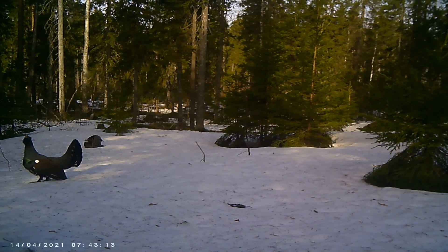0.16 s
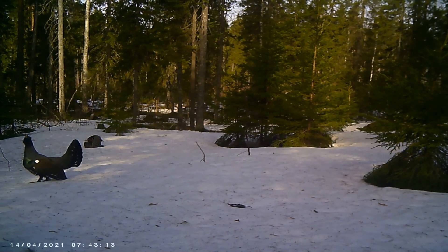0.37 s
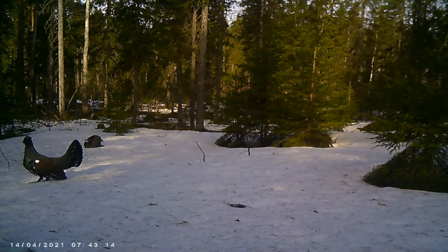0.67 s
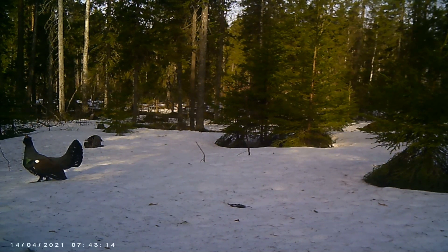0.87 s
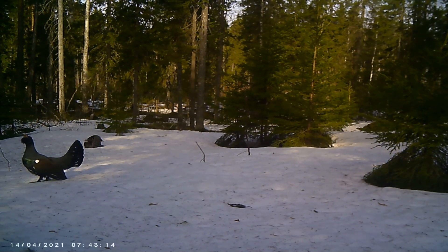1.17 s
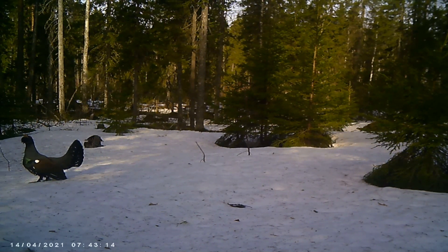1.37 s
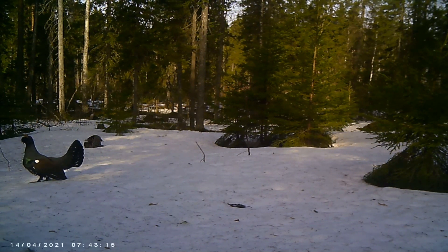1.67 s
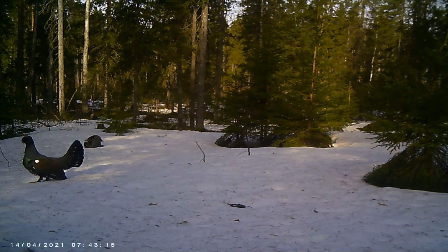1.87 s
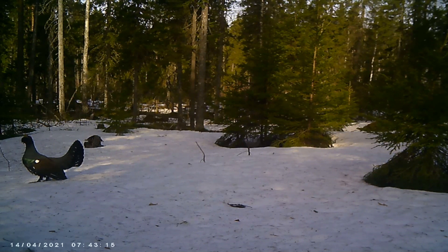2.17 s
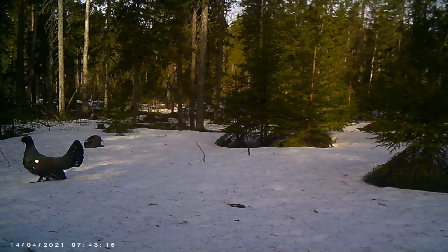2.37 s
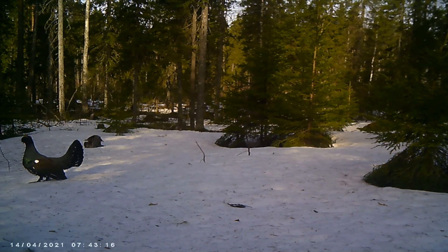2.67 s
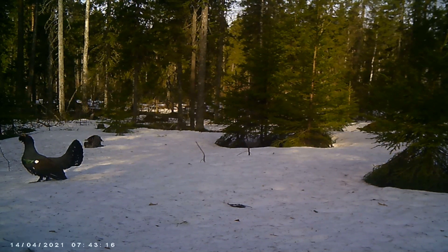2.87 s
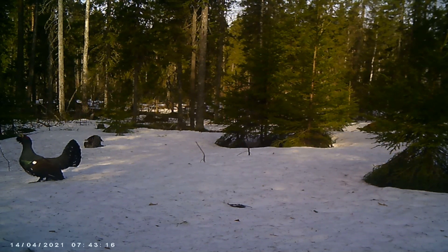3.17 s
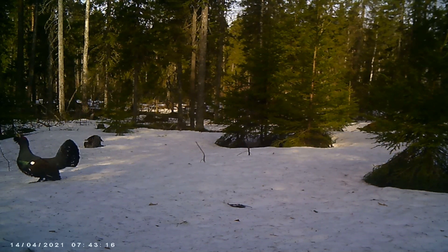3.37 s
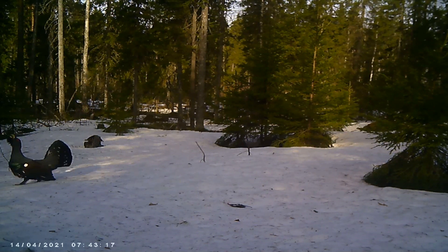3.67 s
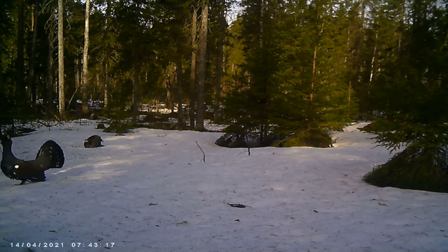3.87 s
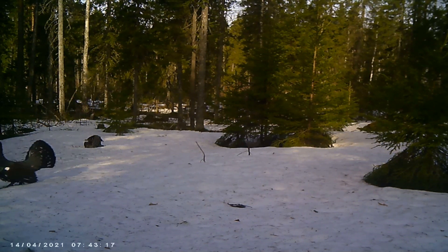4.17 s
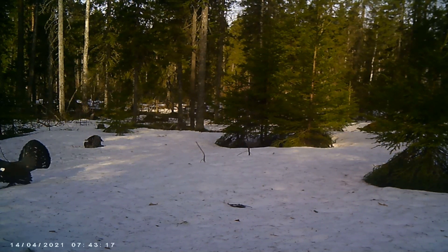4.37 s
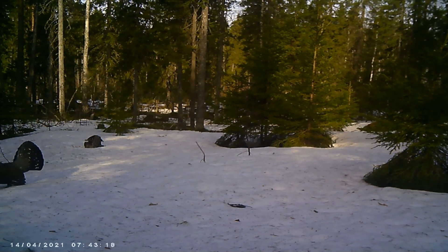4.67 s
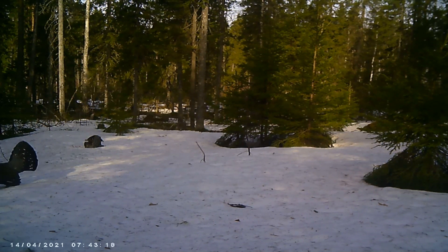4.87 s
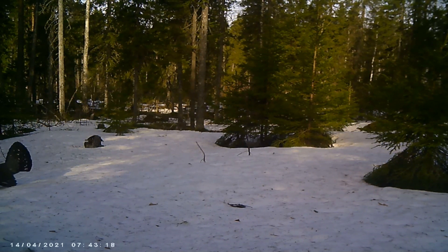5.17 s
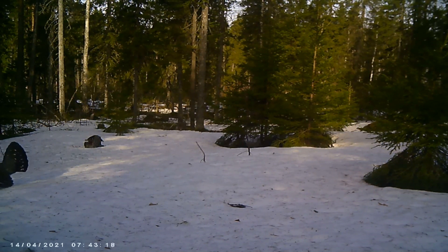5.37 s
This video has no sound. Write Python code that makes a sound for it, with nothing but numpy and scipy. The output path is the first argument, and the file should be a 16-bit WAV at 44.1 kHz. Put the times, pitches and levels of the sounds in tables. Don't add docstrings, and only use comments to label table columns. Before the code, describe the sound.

A large forest bird snaps dry double clicks that quicken into a trill, pops softly, then hisses in scraping bursts over low thumping rumble.

```python
import sys
import numpy as np
from scipy import signal
from scipy.fft import rfft, irfft, next_fast_len
from scipy.io import wavfile
from scipy.ndimage import uniform_filter1d

SR = 44100
rng = np.random.default_rng(int(sys.argv[2]) if len(sys.argv) > 2 else 0)


def generate_wav(signal):
    frames = np.transpose(np.atleast_2d(signal))
    scaled = np.clip(frames, -1, 1) * 32767
    pcm = np.round(scaled).astype(np.int16)
    wavfile.write(sys.argv[1], SR, pcm)


def nominal_scale(level):
    x = np.asarray(level, float) / 20
    return 10 ** x


N = 243873

# ([t/s, peak level/dB, air-
# sac pop level/dB], windpipe modes [f/Hz, level/dB, t60/s])
CLICKS = [
    ([(1.1578, -22, -55)], [(1540, -3, 0.049), (2080, 4, 0.018), (2690, -3.5, 0.029), (2920, -3, 0.026), (3383, 0, 0.031), (3630, -9, 0.027), (4200, -20, .025), (4620, -15, 0.039), (5320, -19, 0.045), (5800, -18, 0.045), (6200, -12, 0.044), (7420, -11, 0.029), (8330, -9.5, 0.017), (10700, -19, 0.031)]),
    ([(1.3109, -30.5, -53)], [(1384, -7, 0.04), (1590, 3.5, 0.02), (2090, -5.5, 0.033), (2670, -11.5, 0.066), (3256, -19, .03), (3490, -12, 0.066), (4100, -12, 0.027), (4920, -18, 0.087), (7620, -14, 0.023), (8370, -11, 0.026), (8800, -16, 0.041)]),
          ([(2.1555, -26, -56.5)], [(1440, -7.5, 0.035), (1956, -3, 0.025), (2140, -4.5, 0.028), (2625, -1.5, 0.036), (3233, -3.5, 0.03), (3470, -5, 0.027), (4400, -17, 0.044), (5103, -19, 0.046), (5850, -17.5, 0.059), (7500, -14, 0.023), (9000, -24, 0.01)]),
    ([(2.3002, -28.5, -49)], [(810, -21, 0.4), (1403, -8.5, 0.084), (2073, -17, 0.08), (1690, -19, 0.043), (3180, -12, 0.044), (3380, -6.5, 0.027), (4050, -13.5, 0.046), (4810, -18.5, 0.084), (6060, -21, 0.029), (6700, -24, 0.036), (7660, -6, 0.0083), (8900, -25, 0.024)]),
          ([(2.8215, -26.5, -52)], [(1305, -9.5, 0.024), (2020, -6.5, 0.041), (2635, -0.5, 0.04), (3190, 2.5, 0.034), (3410, 0, 0.035), (3960, -9.5, 0.037), (4700, -13, 0.02), (5670, -22, 0.034), (6000, -10, 0.024), (7400, -10, 0.016), (8403, -17, 0.022), (9860, -24, 0.058)]),
    ([(2.9352, -35, -48.5)], [(1375, -4, 0.029), (1959, -10, .05), (3120, -2.5, 0.059), (3320, -2, 0.054), (3850, -12, 0.061), (4680, -9, 0.079), (5290, -8.5, 0.076), (6400, 0, 0.015), (7430, -6, 0.014), (8650, -12, 0.027), (9878, -14, 0.032)]),
          ([(3.2166, -27.5, -49.5)], [(1200, -14.5, 0.09), (1950, -4.5, 0.047), (2567, 0, 0.069), (3160, 4.5, .03), (3380, 4.5, 0.039), (3590, 0, 0.037), (4554, -6.5, 0.087), (5400, -15, 0.045), (5980, -17, 0.045), (6750, -22, 0.033), (8403, -24, 0.057)]),
    ([(3.4795, -29, -50.5)], [(1168, -15.5, 0.074), (1910, -6.5, 0.046), (2540, 0, 0.057), (3100, 2, 0.04), (3225, 3.5, 0.042), (3510, 4, 0.062), (3730, -5, .02), (4530, -10, 0.045), (5370, -4, 0.035), (6300, -10.5, 0.04), (8403, -16, 0.057)]),
    ([(3.3019, -37.5, -53.5)], [(1248, -10.5, .08), (1940, -6.5, 0.046), (2574, -4, 0.08), (3150, -3, 0.043), (3350, -2.5, 0.06), (4530, -15, 0.064), (5310, -7, 0.057), (5970, -14, 0.07), (7950, -4.5, 0.017), (8630, -10, 0.039)]),
    ([(3.5359, -36.5, -47.5)], [(1300, -12, .05), (1940, -10, 0.055), (2510, 1.5, 0.094), (3100, -5, 0.043), (3250, -5, 0.05), (4532, -13, 0.064), (5071, -15, .04), (5300, -7, 0.072), (7840, -6, 0.018), (8600, -15, 0.039)]),
          ([(3.6526, -28, -50)], [(1900, -8.5, 0.045), (2527, 0, 0.086), (3130, 2, 0.043), (3360, 4, 0.048), (3530, 3, 0.033), (4478, -8, 0.045), (5200, -11, 0.055), (5630, -4.5, 0.031), (5787, -11, .034), (6298, -6, 0.025), (8000, -5.5, 0.022), (9600, -28, 0.014)]),
    ([(3.7544, -29, -53.5)], [(1890, -6.5, 0.038), (2470, -4, 0.02), (3034, 5, 0.048), (3270, 6.5, 0.047), (3540, -7, .025), (4310, -3, 0.04), (4510, -8, .04), (5474, -7, 0.04), (5850, -10, 0.03), (6174, -3, 0.038), (7860, -5, 0.022), (8500, -14, 0.02)]),
    ([(3.8038, -30, -51)], [(1770, -13, 0.03), (2440, -3.5, 0.088), (3030, 4, 0.076), (3260, -4, .03), (4400, -10, 0.03), (5370, -7, 0.034), (6080, -6, 0.028), (8140, -10, 0.023), (9249, -24, 0.034)]),
    ([(3.8487, -31.5, -53.5)], [(1766, -13, 0.023), (2524, 0, 0.08), (2950, -2, 0.045), (3125, 2.5, 0.055), (4360, -8, 0.07), (5200, -6, 0.044), (6070, -13, 0.025), (8020, -10, 0.023), (9249, -25, 0.034)]),
]
# [t/s, f/Hz]
SAC_PITCH = [(1.158, 396), (1.4, 457), (2.1, 324), (3.6, 311), (3.9, 283)]
# [t/s, level/dB]
CORK_POP = (3.887, -43)
# [t/s, level/dB]
GULPS = [
    (2.283, -52),
    (2.752, -53),
    (3.158, -56),
    (3.286, -48),
]
# [f/Hz, level/dB per Hz]
CHEST = [(120, -30), (250, 5), (450, -1), (900, -12), (1400, -40)]

# [t/s, length/s, level/dB, leading resonance from f/Hz, to f/Hz]
OPENING = [
    (4.329, 0.037, -40.5, 1402, 2650),
]
SWEEPING = [
    (4.834, .107, -37.5, 2134, 2640),
]
FLICKING = [
    (5.06, 0.044, -42.5, 950, 2608),
]
LIFTING = [
    (4.558, 0.044, -39.5, 1446, 2667),
]
CREEPING = [
    (4.675, 0.068, -43, 1760, 2400),
]
CLOSING = [
    (4.452, 0.038, -43.5, 2711, 1405),
]
DROPPING = [
    (4.658, 0.0274, -43.5, 3399, 2603),
    (4.667, 0.0578, -38.5, 2720, 1900),
]
SETTLING = [
    (5.238, .04, -43.5, 2753, 2509),
    (5.251, 0.12, -40.5, 2597, 2201),
]
HUSHED = [
    (4.108, .13, -54, 2552, 2080),
]
MUTED = [
    (4.748, 0.034, -49, 2444, 2132),
    (4.978, 0.02, -54.5, 2615, 2400),
]
TWITCHING = [
    (5.148, 0.037, -46, 1793, 3150),
]
WHEEZING = [
    (4.0, 0.03, -48.5, 5960, 6000),
    (4.07, 0.031, -56, 6500, 6530),
    (4.22, .035, -58, 4900, 5170),
    (4.248, 0.037, -46, 5300, 6220),
    (4.522, 0.032, -54, 5800, 6300),
    (4.59, 0.0299, -50, 5610, 6300),
    (5.035, 0.04, -51, 5764, 6400),
    (5.4, 0.1, -67.5, 6500, 6750),
]
# [low level/dB, partner against low/dB, upper strand against low/dB, middle level/dB, high level/dB]
BALANCES = [(0.5, 0, -17, -0.5, -6), (-1, -2.5, -2, -2.5, -6), (0, 7.5, -29, -1.5, -4.5),
            (-1, 3.5, -15, 1.5, -7.5), (-0.5, 2, -16, 2.5, -8.5), (-0.5, 0, -30, -4, -1),
            (-1.5, -7, -13, 0.5, -13), (-1, -7.5, -15, -0.5, -8), (3, -30, -26, -2, -3),
            (-1, -18, -22, -1.5, -1), (-14.5, -6, -14, 1, -11.5), (0, -14, -29, 2, -5)]
PATHS = [(6370, 5250, 9200, 7700), (6500, 5400, 9600, 7050), (6500, 5500, 9700, 8400),
         (6180, 5400, 9100, 7900), (6300, 5900, 9700, 8400), (5380, 5800, 8000, 9700),
         (5485, 6100, 7700, 7900), (5000, 5900, 7730, 10000), (4850, 4900, 9060, 9600),
         (5020, 5300, 8300, 11000), (2400, 2700, 12000, 7700), (6202, 7100, 8910, 8260)]
# [partner from f/Hz, to f/Hz, under from f/Hz, to f/Hz]
STRANDS = [(2650, 2820, 1550, 1800), (2380, 3060, 1700, 2000), (2902, 2900, 900, 2000),
           (2720, 2980, 1000, 2000), (2950, 2800, 1500, 1700), (2905, 2600, 2100, 1000),
           (3240, 2800, 2200, 1550), (3051, 2800, 2450, 1650), (2943, 2850, 2200, 1638),
           (2855, 2850, 1850, 1650), (2901, 2950, 1800, 2000), (2596, 2900, 1500, 2450)]
UNDER_DB = [-3, -6.5, -9, -11, -2, -4, -6, -4.5, -27, -12, -5.5, -9]
# [t/s, half length/s, level/dB]
CATCHES = [
    (4.9172, .0011, -9),
]
# low, partner, middle, high [width/Hz]
WIDTHS_HZ = (110, 130, 850, 330)
# [f/Hz, width/Hz, level/dB]
PIPE = [(4900, 86, -1), (5430, 61, -9), (6130, 36, 2), (6400, 96, 7), (4300, 300, -1.5), (7200, 300, -1)]
# [f/Hz, width/Hz, level/dB]
HUSHED_MODES = [(4900, 160, -4), (6500, 190, -3)]
HUSHED_SPAN_S = (4.085, 4.2)
# [f/Hz, level/dB]
TOP_MODES = [(4950, -7), (5850, -1), (6430, -4)]

# [t/s, length/s, level/dB]
STEPS = [(2.672, 0.02, -65), (3.461, 0.012, -60.5), (3.478, 0.022, -56.5), (3.689, .015, -66),
         (3.846, 0.025, -58), (3.896, 0.021, -56.5), (3.93, 0.0059, -54), (3.94, 0.025, -55),
         (4.023, 0.0038, -58), (4.107, .004, -62), (4.124, .006, -52), (4.145, .006, -61),
         (4.976, .012, -63), (5.385, 0.013, -61), (4.212, 0.016, -54.5), (4.275, 0.0058, -48.5),
         (4.661, 0.016, -46.5), (4.778, 0.02, -56), (4.86, 0.019, -50.5), (4.93, 0.0087, -51),
         (5.071, 0.019, -46.5), (5.3, 0.026, -51.5), (5.513, .015, -59.5)]
# [f/Hz, level/dB per Hz]
CRUNCH = [(300, -9), (1000, -10), (3000, -3), (6000, -0.5), (9000, 2), (13000, -5.5), (16000, -0.5)]
# [t/s, level/dB]
THUDS = [
    (2.75, -59),
    (4.013, -57.5),
    (4.048, -51.5),
    (4.283, -49),
]

# [t/s, level/dB]
ECHOES = [
    (0.015, -24.5),
    (.04, -23.5),
    (.075, -31),
]
# [f/Hz, t60/s]
FOREST = [(1000, 0.45), (3000, 0.71), (6000, 0.44), (12000, 0.96)]
# [f/Hz, level/dB]
FOLIAGE = [(1500, 0), (3500, -0.5), (4600, -1), (7000, -1.5), (12000, 4)]
# [f/Hz, level/dB]
MIC = [(200, 5.5), (9000, 0), (12000, 1), (15000, -16), (17000, -48)]

# [t/s, depth level/dB, length/s]
LOAD_CYCLE = [(-.05, -31, 0.022), (0.187, -38, 0.033), (0.263, -31.5, 0.026), (0.346, -48, 0.018),
              (0.603, -32, 0.022), (0.742, -38, 0.024), (0.986, -32.5, 0.03), (1.155, -36.5, 0.024),
              (1.217, -32, .033), (1.387, -37, 0.017), (1.546, -31.5, 0.024), (1.779, -38.5, .018)]
LOAD_CHANGE_DB = [
    [.1, .1, .1, .1, 1.5, .1, 1.8, .1, .1, 0.11, .1, .1],
    [.1, 0.093, .1, .1, 0.69, .1, .1, .1, .1, .1, -3, .1],
    [.1, .1, .1, .1, -1.5, .1, -1, .1, .1, .1, .1, .1],
]
# [f/Hz, level/dB per Hz]
RUMBLE = [(8.8, -71), (15, 14), (101, -1.5), (118, -7.5), (184, -9.5), (389, -14.5), (491, -14),
          (551, -16.5), (794, -23), (1500, -24.5), (1950, -35.5), (3300, -120)]
# [t/s, level/dB]
RUMBLE_LEVEL = [(0.0, -64.5), (0.57, -67), (0.98, -65.5), (1.09, -67), (1.45, -65.5), (2.11, -66.5),
                (2.34, -65), (2.57, -66), (3.74, -63), (4.1, -63.5), (5.17, -64), (5.53, -65)]
# [f/Hz, level/dB per Hz]
HISS = [(350, -33), (600, -3.5), (788, -6.5), (891, -11.5), (1150, -19), (1650, -12.5), (5320, -15.5),
        (9440, -17), (11400, -16.5), (15600, -23)]
# [f/Hz, level/dB]
WHINE = [(11117, -88), (11203, -79), (11289, -79), (11375, -89)]
# [f/Hz, level/dB]
CIRCUIT_LINES = [(2169, -89.5), (5200, -89), (7084, -99)]
# [f/Hz, level/dB]
FAR_BIRD = [(4118, -73), (6282, -78)]
# [t/s, length/s, f/Hz, level/dB]
FAR_COO = (3, 0.28, 499.5, -66)


def unit(x):
    return x / np.sqrt(np.mean(x ** 2) + 1e-20)


def along(points, hz):
    f, v = np.transpose(points)
    return np.interp(np.log(hz + 1), np.log(f + 1), v)


def filtered(x, response):
    m = next_fast_len(N + SR // 2)
    return irfft(rfft(x, m) * response(np.fft.rfftfreq(m, 1 / SR)), m)[:N]


def noise(spectrum):
    return unit(filtered(rng.standard_normal(N), lambda hz: nominal_scale(along(spectrum, hz))))


def wander(shape, samples):
    return unit(uniform_filter1d(rng.standard_normal(shape), samples, axis=-1))


def add(track, s, sound):
    part = track[round(s * SR):][:len(sound)]
    part += sound[:len(part)]


def tones():
    t = np.arange(N) / SR
    whine = sum(np.sqrt(2) * nominal_scale(db) * np.sin(2 * np.pi * (hz * t + rng.random())) for hz, db in WHINE)
    drift = 0.03 * np.cumsum(rng.standard_normal(N))
    lines = sum(nominal_scale(db + 5.5) * np.sin(2 * np.pi * hz * t + 0.89 * drift) for hz, db in CIRCUIT_LINES)
    s, length, hz, db = FAR_COO
    swell = np.sin(np.pi * np.clip((t - s) / length, 0, 1)) ** 0.5
    coo = np.nan_to_num(nominal_scale(db) * swell * np.sin(2 * np.pi * hz * t))
    fade = np.clip((0.1 - t) / 0.024, 0, 1)
    far_whistle = fade * sum(nominal_scale(db) * np.sin(2 * np.pi * hz * t + drift) for hz, db in FAR_BIRD)
    return whine + lines + coo + far_whistle


def supply_edge(u):
    return (1 - np.exp(-np.abs(u) / 0.0059)) * np.exp(-np.abs(u) / 0.022) * (u > 0)


def thumps():
    cycle_s = 1.9975
    t, out = np.arange(N) / SR, np.zeros(N)
    for k, changes in enumerate(LOAD_CHANGE_DB):
        for (s, db, length), more_db in zip(LOAD_CYCLE, changes):
            u = t - s - k * cycle_s + 0.00408
            aftershock = supply_edge(u - length - 0.033) - 0.34 * supply_edge(u - length - 0.016)
            after = (0.5 + 0.21 * rng.standard_normal()) * aftershock
            out += nominal_scale(db + more_db + 3.0) * (0.86 * supply_edge(u - length) - supply_edge(u) + after)
    busy = uniform_filter1d(np.abs(out), 1500)
    rumble_db = np.interp(t, *np.transpose(RUMBLE_LEVEL)) + 10.5
    return out + nominal_scale(rumble_db) * (1 + busy / 0.016) * noise(RUMBLE)


def forest(x):
    hz, t, z = signal.stft(rng.standard_normal(SR // 2), SR, nperseg=256)
    tail = signal.istft(z * nominal_scale(-60 * t / along(FOREST, hz)[:, None]), SR, nperseg=256)[1]
    answer = nominal_scale(-20.0) * np.pad(tail, (500, 0)) / np.linalg.norm(tail)
    for s, db in ECHOES:
        smear = rng.standard_normal(SR // 20) * nominal_scale(-60 * np.arange(SR // 20) / SR / 0.008)
        add(answer, s, nominal_scale(db) * smear / np.linalg.norm(smear))
    rustle = 0.25
    blur = (1 + rustle * wander(N, 150)) / np.hypot(1, rustle)
    far = filtered(signal.fftconvolve(x, answer)[:N] * blur, lambda hz: nominal_scale(along(FOLIAGE, hz)))
    bounce = nominal_scale(-18.5) * np.roll(x, round(0.0038 * SR))
    return x + bounce + far


def thuds():
    out, t = np.zeros(N), np.arange(SR // 20) / SR
    for s, db in THUDS:
        add(out, s, nominal_scale(db - 60 * t / 0.04) * (1 - np.exp(-t / 0.0013)) * rng.standard_normal(len(t)))
    return filtered(out, lambda hz: nominal_scale(13.5) / (1 + 1j * hz / 900) * (hz > 150))


def steps():
    t, level = np.arange(N) / SR, np.zeros(N)
    cracks = rng.standard_normal(N) * (1 + rng.exponential(1, N))
    grains = unit(filtered(cracks, lambda hz: nominal_scale(along(CRUNCH, hz))))
    for s, length, db in STEPS:
        inside = np.minimum(2.5 * (t - s), s + length - t)
        level += nominal_scale(db) * np.clip(inside / 0.017 + 0.83, 0, 1) ** 2
    return grains * level


def opening_stroke(t, s, length):
    swell_share, swell_db, creep_db, cut_db_per_s = 0.5, 28.5, 4, 3201
    u = (t - s) / length
    rise_db = np.interp(u, [-2, 0, swell_share, 1], [-99, -swell_db - creep_db, -creep_db, 0])
    return rise_db - cut_db_per_s * np.maximum(t - s - length, 0), np.clip(u, 0, 1.3)


def closing_stroke(t, s, length, snap_db_per_s):
    hold_share, sag_db, fade_db, shut_s = 0.46, 3.5, 30, 0.021
    fall_db = np.interp((t - s) / length, [0, hold_share, 1, 3], [0, -sag_db, -sag_db - fade_db, -99])
    way = 1 - np.exp(-np.maximum(t - s, -shut_s / 5) / shut_s)
    return fall_db + snap_db_per_s * np.minimum(t - s, 0), way


def strokes(t):
    rest_hz = 2340
    levels, centres, kinds = [], [], []
    order = (OPENING, SWEEPING, FLICKING, LIFTING, CREEPING, CLOSING,
             DROPPING, SETTLING, HUSHED, MUTED, WHEEZING, TWITCHING)
    for rows, balance, path, strand, under_db in zip(order, BALANCES, PATHS, STRANDS, UNDER_DB):
        middle_from, middle_to, high_from, high_to = path
        partner_from, partner_to, under_from, under_to = strand
        for s, length, db, start, end in rows:
            if rows in (HUSHED, MUTED):
                shape_db, way = closing_stroke(t, s, length, snap_db_per_s=1294)
            elif rows in (CLOSING, DROPPING, SETTLING):
                shape_db, way = closing_stroke(t, s, length, snap_db_per_s=4497)
            else:
                shape_db, way = opening_stroke(t, s, length)
            levels.append(nominal_scale(np.maximum(db + shape_db, -150)) ** 2)
            lead = start + (end - start) * way
            other = middle_from + (middle_to - middle_from) * way
            high = high_from + (high_to - high_from) * np.clip((t - s) / length, 0, 1.3)
            partner = partner_from + (partner_to - partner_from) * way
            under = under_from + (under_to - under_from) * way
            low, middle = (other, lead) if rows is WHEEZING else (lead, other)
            centres.append((low, middle, high, partner, under))
            kinds.append((*balance, under_db))
    power = np.sum(levels, axis=0)
    share = np.array(levels) / power
    centres = (share[:, None] * centres).sum(0)
    low_db, partner_db, upper_db, middle_db, high_db, under_db = np.transpose(kinds) @ share
    wide_khz = (centres[0] - rest_hz) / 1000
    balance = np.array([low_db, middle_db - 5.5 * wide_khz, high_db + 0.5 * wide_khz])
    caught_db = sum(db * np.clip(2 - np.abs(t - s) / half, 0, 1) for s, half, db in CATCHES)
    return 10 * np.log10(power) + caught_db + balance, centres, partner_db, upper_db, under_db


def whistle(hz, db, t):
    drift_rad, wobble_db = 0.04, 2
    now = np.arange(N) / SR
    hz = np.array([np.interp(now, t, row) for row in hz])
    db = np.array([np.interp(now, t, row) for row in db])
    turn = np.cumsum(2 * np.pi * hz / SR + drift_rad * rng.standard_normal(hz.shape), axis=1)
    wobble = wander(hz.shape, 300)
    sung = (nominal_scale(db + wobble_db * wobble) * np.sin(turn)).sum(0)
    return sung / np.sqrt((nominal_scale(db) ** 2).sum(0) / 2)


def scrapes():
    puffs = (rng.random(N) < 0.12) * rng.uniform(0.3, 1, N)
    source = unit(puffs - puffs.mean()) + 1.1 * rng.standard_normal(N)
    hz, t, z = signal.stft(source, SR, nperseg=512, noverlap=448)
    hz = hz[:, None]
    lit = uniform_filter1d(rng.standard_normal(z.shape), size=24, axis=1)
    lit = uniform_filter1d(lit, size=2, axis=0)
    z = z * nominal_scale(np.clip(hz / 1800, 0, 2) * unit(lit))

    def hump(centre, width):
        return 1 / (1 + ((hz - centre) / width) ** 2)

    def sound(shape):
        level = np.sqrt(np.mean(shape ** 2, 0))
        return unit(signal.istft(z * shape / level, SR, nperseg=512, noverlap=448)[1][:N])

    def hushed(at):
        return (at > HUSHED_SPAN_S[0]) & (at < HUSHED_SPAN_S[1])

    now = np.arange(N) / SR
    shut = uniform_filter1d(1. * hushed(now), size=300)
    levels_db, centres, partner_db, upper_db, under_db = strokes(t)
    low_hz, middle_hz, high_hz, partner_hz, under_hz = centres
    upper_hz = partner_hz + 497
    low_width, partner_width, middle_width, high_width = WIDTHS_HZ

    low = hump(low_hz, low_width) + 0.3 * hump(low_hz, 1500) ** 2
    low = low + nominal_scale(partner_db) * hump(partner_hz, partner_width)
    low = low + nominal_scale(under_db) * hump(under_hz, low_width) + nominal_scale(upper_db) * hump(upper_hz, partner_width)
    low = sound(low * hump(0, 5300) ** 3 * (1 - hump(0, 850)) ** 2)
    locked = whistle([low_hz, partner_hz, under_hz, upper_hz], [0 * t, partner_db, under_db, upper_db], t)
    low = unit(low + nominal_scale(3 - 9 * shut) * locked)
    octave = unit(filtered(low ** 2, lambda f: np.clip(f / 1000 - 3.6, 0.25, 1) * (f > 3200)))

    pipe = nominal_scale(sum(db * hump(centre, width) for centre, width, db in PIPE))
    under_high = hz < np.clip(high_hz - 1100, 6300, 7100)
    middle = hump(middle_hz, middle_width) * pipe * under_high * (1 - hump(0, 1900) ** 2) ** 4
    nearly_shut = sum(nominal_scale(db) * hump(centre, width) for centre, width, db in HUSHED_MODES)
    middle = sound(np.where(hushed(t), nearly_shut, middle))
    modes_hz = [middle_hz] + [centre + 70 * wander(len(t), 25) for centre, db in TOP_MODES]
    modes_db = [0 * t] + [db + 0 * t for centre, db in TOP_MODES]
    middle = unit(middle + nominal_scale(-3.0) * whistle(modes_hz, modes_db, t) * (1 - shut))

    gap = 1 - 0.7 * hump(high_hz - 900, 400)
    high = sound((hump(high_hz, high_width) + 0.15 * hump(high_hz + 1600, 1000)) * gap)

    gains = nominal_scale([np.interp(now, t, db) for db in levels_db])
    size = np.sqrt((gains ** 2).sum(0))
    jet = (gains * [low + 0.14 * octave, middle, high]).sum(0) / size

    def push_colour(f):
        band = 1 / (1 + (2000 / (f + 1)) ** 6) / (1 + (f / 7500) ** 4)
        return band * (1 - 0.6 / (1 + ((f - 4000) / 500) ** 2))

    return size * (jet + 0.15 * filtered(jet ** 2, push_colour))


def pop(s, db, fall=-8.7, start=0.88):
    t = np.arange(SR // 20) / SR
    hz = start * np.interp(s, *np.transpose(SAC_PITCH))
    swell = (t / 0.007) ** 2 * np.exp(2 - 2 * t / 0.0059)
    return nominal_scale(db) * swell * np.sin(2 * np.pi * hz * t * (1 - fall * t))


def snap(modes, t):
    hz, level, t60 = np.transpose(modes)[:, :, None]
    held_s, held_after = 0.012, 0.16
    held = held_after + (1 - held_after) / (1 + (t / held_s) ** 5)
    level_luck, phase_luck = rng.standard_normal((2, len(modes), 1))
    decay = nominal_scale(level + 0.62 * level_luck - 60 * t / np.clip(t60, 0.008, 0.08))
    ring = decay * np.sin(2 * np.pi * hz * t + 1.76 * phase_luck)
    flutter = 1 + 0.25 * wander((len(modes), len(t)), 60)
    crack = nominal_scale(-18.0 - 60 * t / 0.073) * rng.standard_normal(len(t))
    out = ((ring * flutter).sum(0) + crack) * held * (1 - np.exp(-t / 0.00016))
    return out / np.abs(out).max()


def clicks():
    dry, sac, t = np.zeros(N), np.zeros(N), np.arange(SR // 10) / SR
    chest = noise(CHEST)
    chest_db, chest_t60_s = -24, 0.059
    for rows, modes in CLICKS:
        for s, db, pop_db in rows:
            add(dry, s + 0.0005, nominal_scale(db + 1.5) * snap(modes, t))
            add(sac, s, pop(s, pop_db + 8.5))
            shake = nominal_scale(db + chest_db - 60 * t / chest_t60_s) * (1 - np.exp(-t / 0.0022))
            add(sac, s, shake * chest[round(s * SR):][:len(t)])
    for s, db in GULPS:
        add(sac, s, pop(s, db))
    add(sac, CORK_POP[0], pop(*CORK_POP, fall=4.1, start=1))
    highpass = signal.butter(N=3, Wn=1150, btype="high", fs=SR, output="sos")
    return signal.sosfilt(highpass, dry), sac


def scene():
    dry, sac = clicks()
    bird = forest(dry + nominal_scale(-1.5) * scrapes() + steps())
    air = filtered(bird, lambda hz: nominal_scale(along(MIC, hz)))
    return (air + sac + thumps() + tones() + thuds())[None]


def roll_off(x):
    return signal.sosfilt(signal.butter(12, 15780, fs=SR, output="sos"), x)


def record(dry):
    size = np.sqrt(1 + np.abs(dry - 0.002) / 0.004)
    hissy = dry + nominal_scale(-70.0) * size * noise(HISS)
    mix = filtered(hissy[0], lambda hz: hz < 15760)[None]
    return roll_off(mix)


dry = scene()
out = record(dry)
generate_wav(out)
```